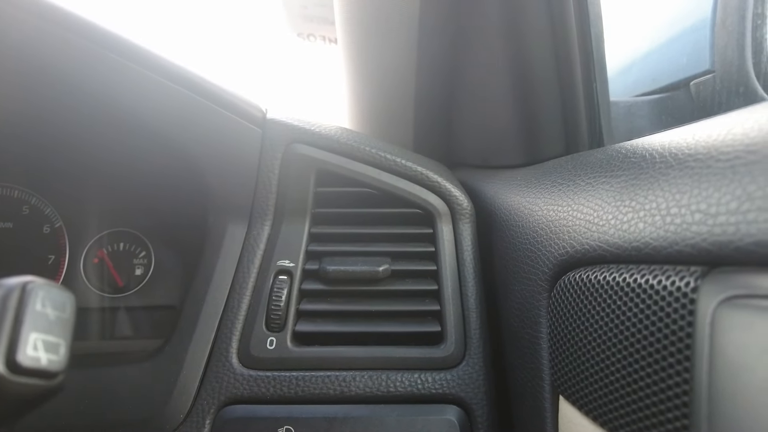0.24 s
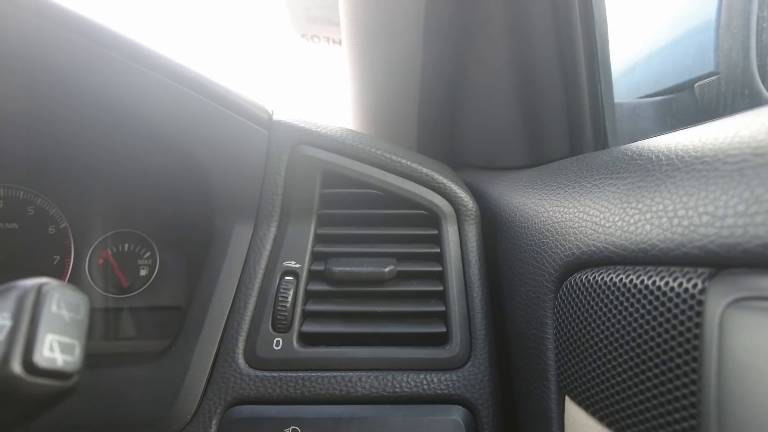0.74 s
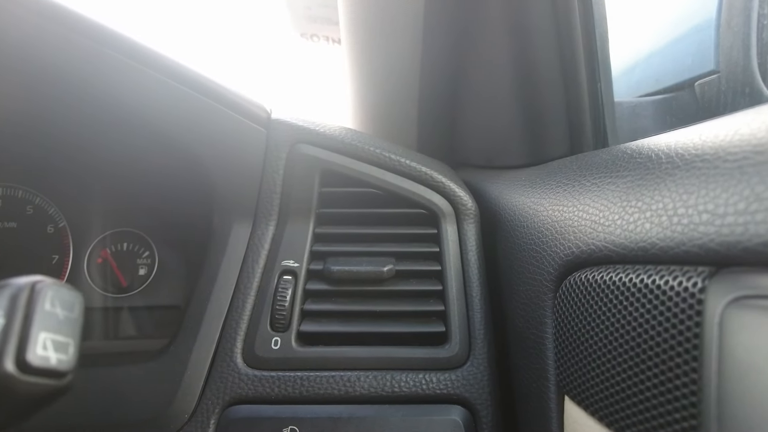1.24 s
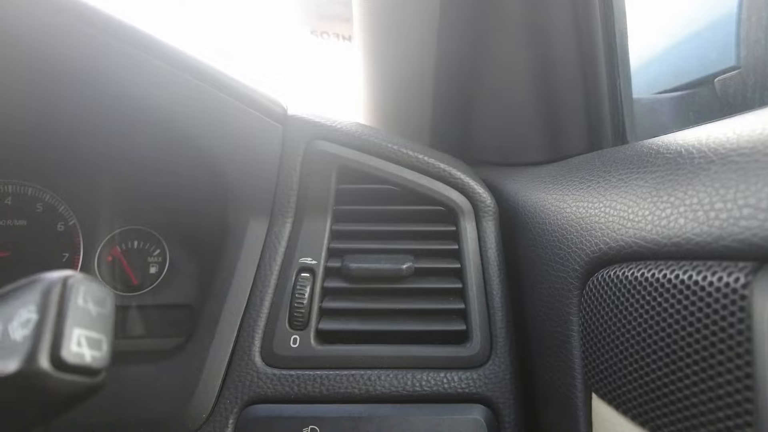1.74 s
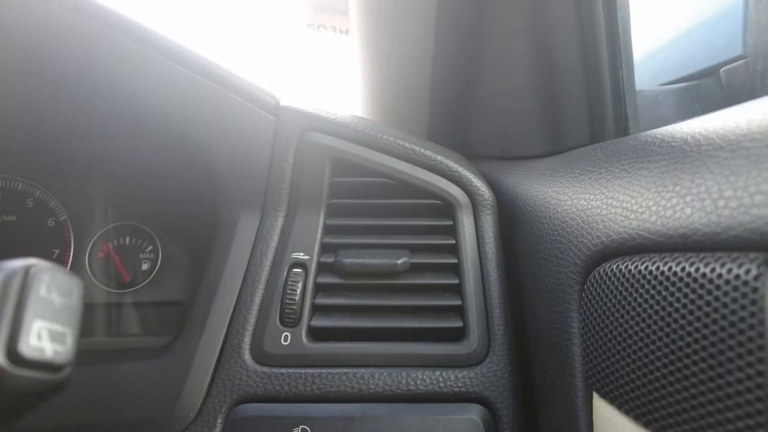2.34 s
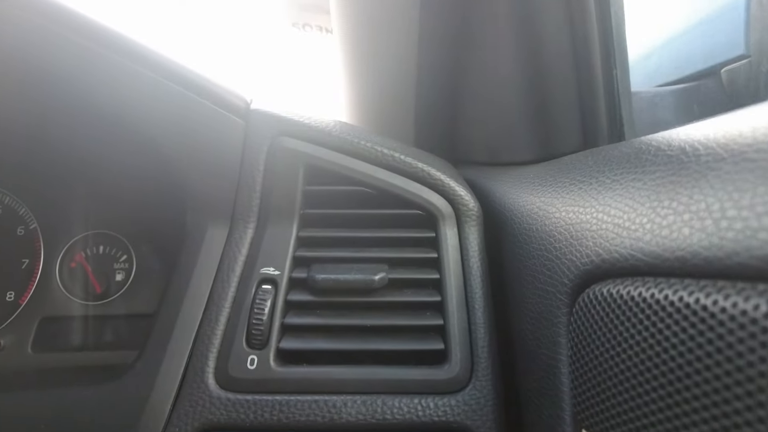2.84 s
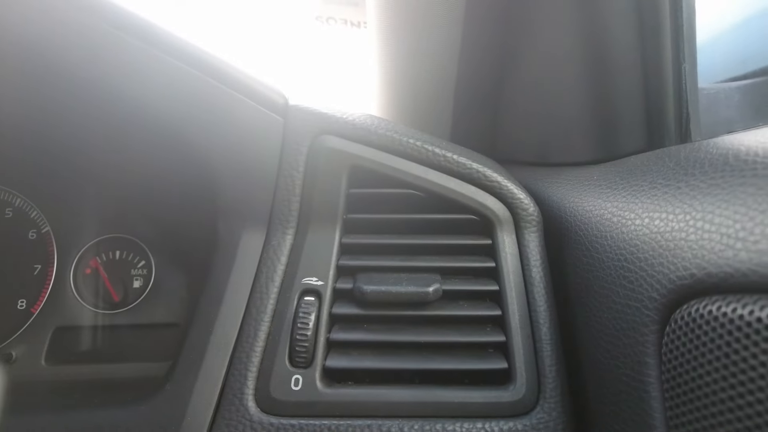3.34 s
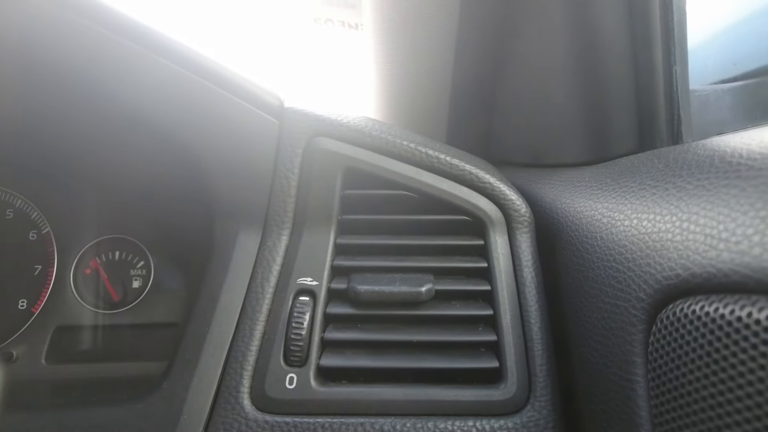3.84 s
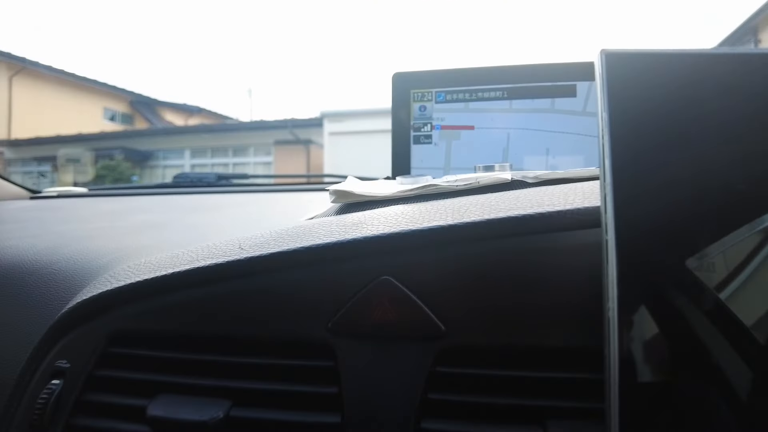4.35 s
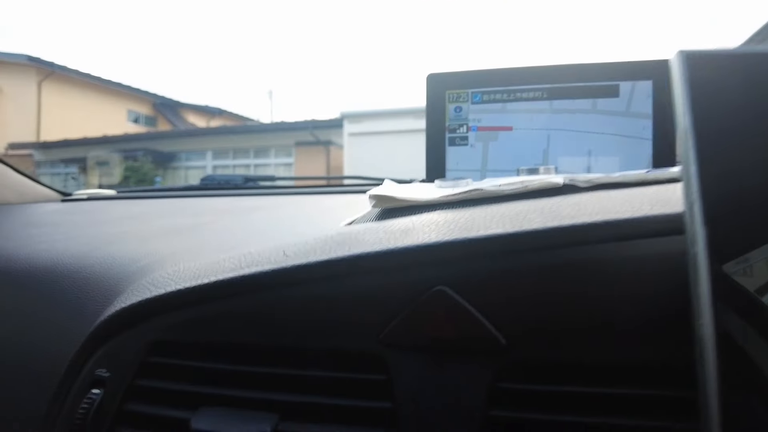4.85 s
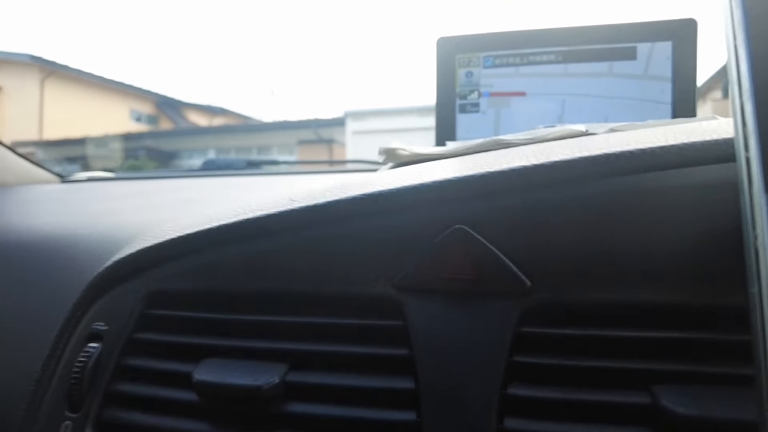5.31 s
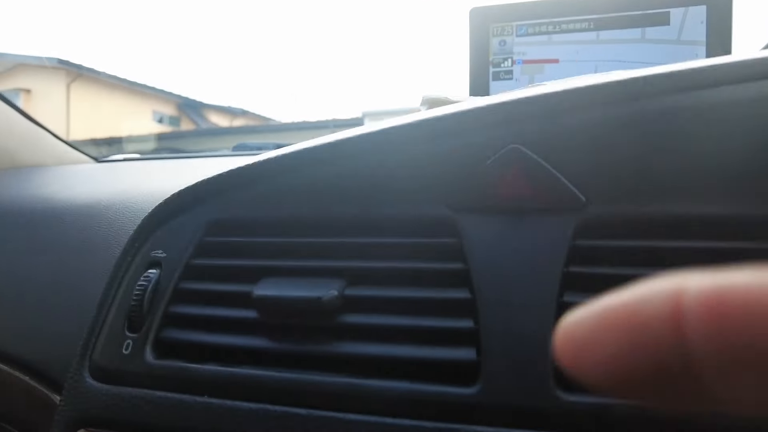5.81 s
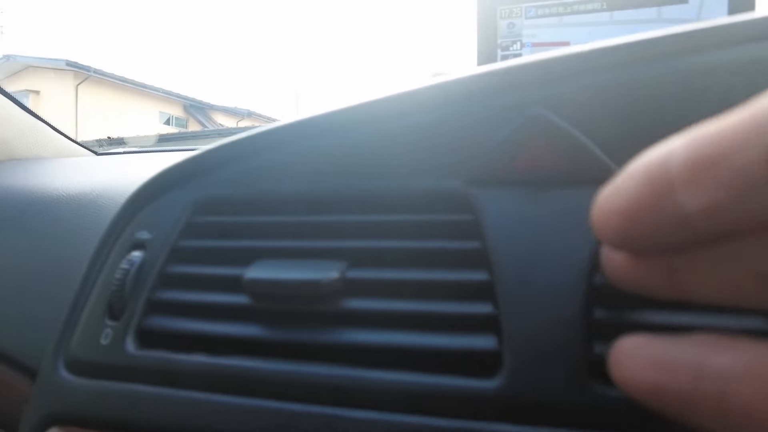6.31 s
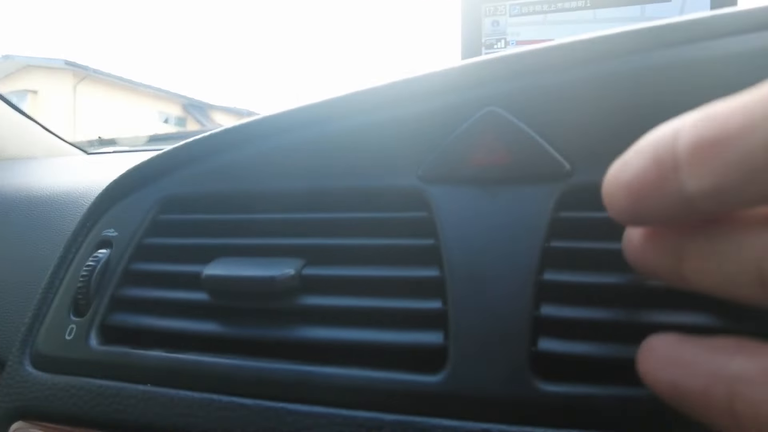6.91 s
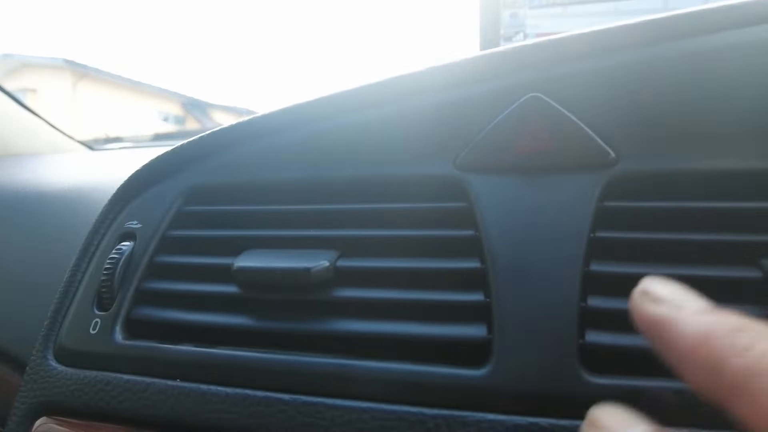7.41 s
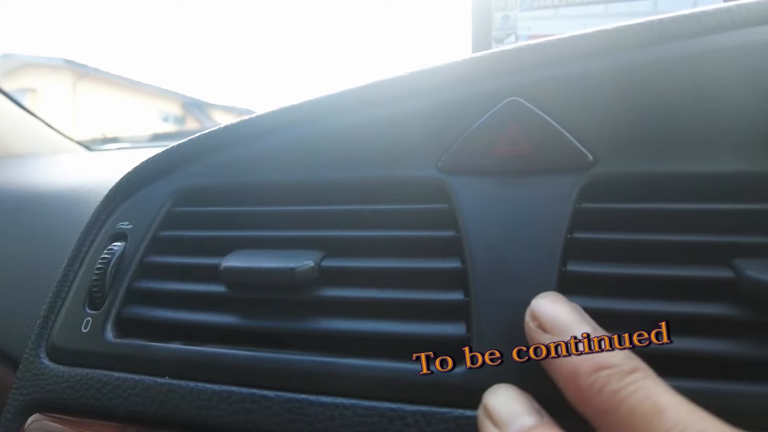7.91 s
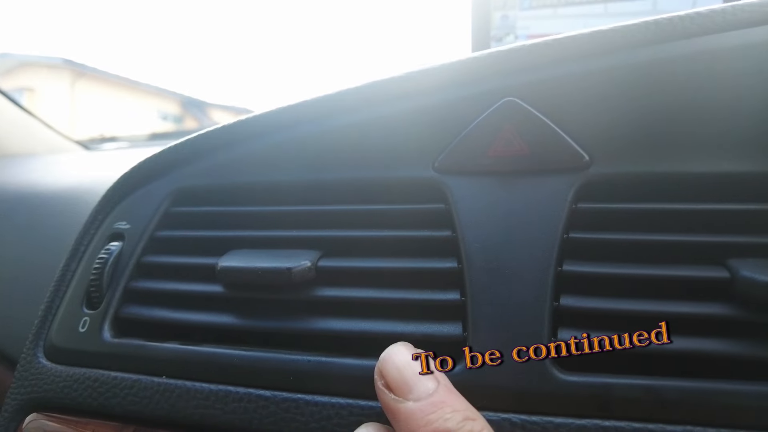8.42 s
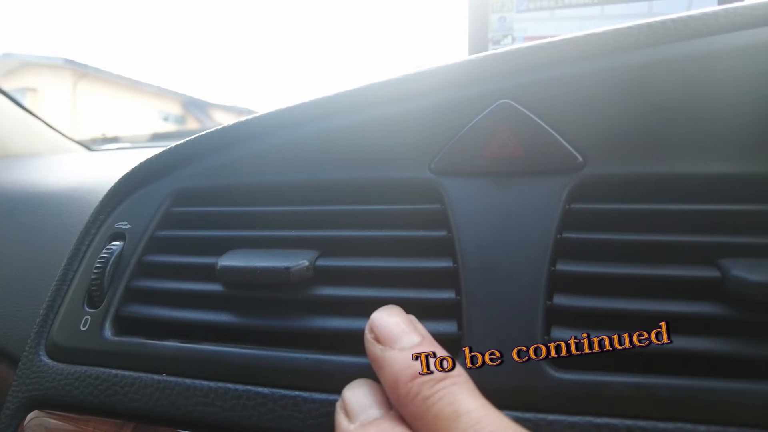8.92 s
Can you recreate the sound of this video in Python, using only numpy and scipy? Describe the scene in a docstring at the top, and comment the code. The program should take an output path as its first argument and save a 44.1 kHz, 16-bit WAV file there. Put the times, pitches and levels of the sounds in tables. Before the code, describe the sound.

Inside a parked car, the engine idles with a deep, even throb while the blower hums and pushes rushing air through the dashboard vents. The microphone is close to a side vent at first. About four seconds in, the sound cuts out for an instant and returns fuller by the centre vents. A few small plastic ticks and very faint cloth rustles occur, and a short puff of air hits the microphone near the end.

```python
"""Inside a parked car, a five-cylinder engine throbs at idle over a low cabin boom, while the blower
motor hums and pushes rushing air through the dashboard vents. The microphone is held first by the side
vent; the sound drops out for an instant and returns, fuller, by the centre vents. One puff of air hits
the microphone, plastic ticks now and then, and rubbing cloth rustles faintly."""
import sys
import numpy as np
from scipy import signal
from scipy.fft import rfft, irfft, next_fast_len
from scipy.io import wavfile

SR = 44100
rng = np.random.default_rng(int(sys.argv[2]) if len(sys.argv) > 2 else 0)


def wav_record(signal):
    """Record a signal, one row per channel, as 16-bit PCM in the file named by sys.argv[1]."""
    frames = np.transpose(np.atleast_2d(signal))
    bounded = np.clip(frames, -1, 1)
    # unit amplitude maps onto the largest positive 16-bit level
    quanta = np.round(bounded * 32767).astype(np.int16)
    wavfile.write(sys.argv[1], SR, quanta)


N = 403956
TIME = np.arange(N) / SR
STOP_S, RESUME_S = 4.07775, 4.11384   # the silent gap between the two places

# How the engine idles. Each row: time in seconds, firings per second, level of the main tone in dB.
IDLE_SIDE_VENT = [(0, 31.9, -23.5), (.55, 31.85, -24.5), (1.0, 32.2, -21), (1.5, 32.4, -21),
                  (2.0, 32.25, -20), (2.5, 32.0, -21.5), (3.0, 32.03, -22.5), (3.4, 32.05, -21.5),
                  (3.85, 32.2, -21.5), (4.0, 32.15, -28), (4.07, 32.1, -23.5)]
IDLE_CENTRE = [(4.12, 32.0, -18), (4.75, 32.15, -16.5), (5.2, 32.05, -17.5), (5.6, 31.72, -20),
               (6.2, 31.78, -19), (6.9, 31.9, -18.5), (7.2, 31.85, -19), (7.9, 31.75, -20.5),
               (8.3, 31.85, -19), (9.16, 31.8, -20)]
# The engine's tones. Each row: multiple of the firing rate, level in dB next to the main tone.
# The multiples that are not whole come from uneven cylinders.
ENGINE_TONES_SIDE_VENT = [(.8, -22), (1, 0), (2, -16), (3, -28), (5, -25), (8, -26)]
ENGINE_TONES_CENTRE = [(.8, -16), (1, 0), (2, -16), (2.8, -26), (5, -31)]

def engine(idle, tones, crest_s):
    """The cylinders fire in quick turn and make a deep throb; all its tones peak together at crest_s."""
    firings_per_s, level_db = in_time(idle)
    firings = np.cumsum(firings_per_s) / SR
    firings -= firings[round(crest_s * SR)]
    throb = sum(from_db(db) * np.cos(2 * np.pi * multiple * firings) for multiple, db in tones)
    return np.sqrt(2) * from_db(level_db) * throb


# The tone of the air that both ears share. Each row: frequency in Hz, relative level in dB.
AIR_SIDE_VENT = [(41, -35), (70, 2), (158, -4), (212, -6), (255, -6.5), (410, -14), (502, -22.5),
                 (1160, -31.5), (1670, -27.5), (5000, -48.5), (10000, -61.5), (15700, -68)]
AIR_CENTRE = [(41, -35), (70, -3.5), (103, -2), (169, -6), (208, -8.5), (260, -7.5), (285, -11.5),
              (312, -18), (562, -19.5), (826, -25), (968, -29), (1750, -29), (15700, -68)]
# The tone of the air's spread between left and right. Each row: frequency in Hz, relative level in dB.
SPREAD_SIDE_VENT = [(15, -12), (40, -3.5), (163, -8), (267, -6), (414, -10), (553, -17), (685, -17.5),
                    (800, -15.5), (1180, -21), (1250, -34), (1520, -27), (2820, -27.5), (3670, -36.5),
                    (4400, -36), (5000, -39), (15700, -61)]
SPREAD_CENTRE = [(41, -19), (70, 0), (105, -6), (168, 2), (198, -6.5), (350, -6), (659, -7.5), (834, -12.5),
                 (1000, -11), (1180, -14), (1250, -20), (1450, -17.5), (3000, -22), (3770, -27.5),
                 (4400, -28.5), (5000, -34), (8000, -38), (13000, -46), (15700, -68)]
# Where the cabin and ducts ring or go dead; by the side vent, the narrow peak near 2856 Hz is a thin whine in
# the air. Each row: frequency in Hz, width in Hz, boost or cut in dB.
CABIN_SIDE_VENT = [(158.2, 25.4, 5), (213, 30.4, -6.5), (265, 49, 3), (470, 82, 3.5), (563, 42, -1.5),
                   (686, 79, 6.5), (832, 33, -8), (876, 93, 3.5), (1124, 58, 3.5), (1164, 61, -6),
                   (1288, 153, 7), (1496, 93, 6.5), (1541, 65, -6), (1720, 120, 2), (1750, 48, -5.5),
                   (2365, 130, -4.5), (2480, 110, 2.5), (2856, 70, 4.5), (3720, 250, -1.5),
                   (4120, 200, 1.5), (4280, 180, 0.5), (7800, 450, 1.5)]
CABIN_CENTRE = [(98, 26, 3), (169, 21, -10.5), (246, 20, -1), (272, 21, -3), (343, 42, 4),
                (563.5, 32, -9.5), (671, 39, 2.5), (829, 49, 5.5), (903, 70, 2), (1075, 71, 5.5),
                (1260, 106, 4), (1715, 40, 1), (1743, 110, 3), (1836, 50, -4), (1995, 68, -2.5),
                (2390, 91, -2), (2460, 79, 3.5), (2904, 110, 4), (3160, 79, 2.5), (3660, 460, -2.5),
                (4150, 180, 1.5), (5800, 1100, 1.6), (7100, 380, -2.5), (7700, 1000, 1.5),
                (11400, 3000, -1.5)]
# How the cabin's ringing pulls the air and the hum to one ear. Each row: frequency in Hz, share in step
# (above 0, the left is louder), share a quarter cycle ahead (above 0, the left comes first).
PULL_SIDE_VENT = [(80, 0, 0), (220, .05, .1), (330, .12, .4), (470, .15, 0), (540, .12, .4), (630, .1, -.6),
                  (780, .27, .42), (1000, .3, 0), (1150, .35, 0), (1320, -.15, .6), (1410, -.35, .15),
                  (1520, .05, .6), (1750, .05, -.1), (1900, .55, 0), (2050, 0, .3), (2300, -.25, -.35),
                  (2500, 0, .4), (2650, -.2, -.5), (3000, -.1, 0), (3500, .1, .1), (6000, .05, 0)]
PULL_CENTRE = [(80, 0, 0), (125, .35, .45), (200, -.1, -.8), (270, .05, .55), (350, .07, .85),
               (410, 0, .65), (490, -.08, -.8), (600, .1, 0), (780, .27, .3), (870, .2, -.45), (940, .2, 0),
               (1030, .27, -.5), (1200, .1, -.2), (1400, -.15, .2), (1550, -.1, -.1), (1750, -.15, .45),
               (1950, -.05, -.1), (2250, -.05, .45), (2370, -.1, 0), (2500, -.1, .45), (2800, -.15, .15),
               (3300, 0, .3), (4000, -.03, 0)]

def vent_air(tone, spread_tone, cabin, pull, shared_db, spread_db, gust_db, flutter_db, eddy_db):
    """Air tumbles through the ducts: its brighter part gusts and flutters, and eddies make it patchy."""
    shared, spread = shaped_noise(tone, spread_tone, cabin, ripple_db=0.8, pull=pull)
    rush = stereo(from_db(shared_db) * shared, from_db(spread_db) * spread)
    for hz in (300, 1200):
        upper = filtered(rush, 2, hz, "high")
        rush += upper * (from_db(gust_db * drift(6) + flutter_db * drift(16)) - 1)
    eddy_edges_hz = np.geomspace(420, 1400, 7)
    for band_hz in zip(eddy_edges_hz, eddy_edges_hz[1:]):
        rush += filtered(rush, 1, band_hz, "band") * (from_db(eddy_db * drift(12)) - 1)
    return rush


# How the air changes as the hand moves the microphone.
# Each row: time in seconds, boost of the hollow band in dB, boost of the upper spread in dB.
HAND_SIDE_VENT = [(0, -.5, -0.5), (2.7, 0.2, 0), (3.2, 0.7, -1.5), (4.07, 1.7, -1.5)]
HAND_CENTRE = [(4.12, -2.7, -2), (5.0, -1.1, -0.34), (6.0, 0.75, 0.29), (7.0, 0.95, 1.2), (7.6, 0.76, 0),
               (9.16, .5, 0)]

def near_grille(rush, hand, hollow_hz):
    """As the microphone shifts by the grille, a hollow band swells and the rush widens or narrows."""
    hollow_db, widen_db = in_time(hand)
    rush = rush + filtered(rush, 1, hollow_hz, "band") * (from_db(hollow_db) - 1)
    upper_spread = filtered(rush[0] - rush[1], 1, 900, "high") / 2
    return rush + stereo(0, upper_spread * (from_db(widen_db) - 1))


# The blower motor's tones. Each entry: level in dB, at 1, 2, 3, .. times the motor's speed.
HUM_SIDE_VENT = [-31, -46, -45, -62, -48, -55, -62.5, -56.5, -59, -60, -75, -62]
HUM_CENTRE = [-33.5, -35, -46, -38.5, -45, -52, -58, -68]

def blower(levels_db, pull, waver_db, rough_db, turns_per_s=50.97):
    """The motor hums; each tone wavers and the fan's load roughens it. Gives shared part and spread."""
    turns = turns_per_s * TIME
    shared = spread = 0
    for multiple, db in enumerate(levels_db, start=1):
        level = from_db(db + waver_db * drift(2.5) + rough_db * drift(14))
        tone = np.sqrt(2) * level * np.exp(2j * np.pi * (multiple * turns + rng.random()))
        shared += tone.real
        spread += (pull_at(pull, multiple * turns_per_s) * tone).real
    return shared, from_db(-14) * spread


def cabin_boom(hz, width_hz, db):
    """The rumbling car body stirs the cabin's lowest note."""
    band_hz = [hz - width_hz / 2, hz + width_hz / 2]
    return from_db(db) * unit_level(filtered(rng.standard_normal(N), 3, band_hz, "band"))


def air_puff(middle_s=8.122, swell_s=.024):
    """A gust hits the microphone and pushes its left and right halves in opposite directions."""
    age = (TIME - middle_s) / swell_s
    lumps = unit_level(filtered(rng.standard_normal(N), 2, 300, "low"))
    swing = np.sin(2 * np.pi * age * 0.32)
    push = from_db(-19) * np.exp(-age ** 2) * (0.15 * lumps - swing)
    return stereo(0.59 * push, push)


# The ticks. Each row: start in seconds, level in dB, seconds for the tail to fade by 60 dB, left minus
# right in dB, treble limit in Hz, note struck hardest in Hz, share of that note that rings on.
TICKS = [(1.0008, -34, .085, -1, 10500, 7600, .1), (4.7597, -35.5, .09, -3.5, 15000, 8900, .04),
         (6.0781, -35.5, .14, -2, 16000, 5400, .02)]
# The notes the plastic rings at. Each row: frequency in Hz, relative level in dB.
PLASTIC_NOTES = [(2900, -3), (3600, -3), (4700, 0), (5400, -4), (6500, -2), (7600, -5), (8900, -7),
                 (10300, -8), (12500, -16), (14500, -13)]

def plastic_ticks(struck_boost_db=4):
    """Plastic cracks briefly, rings with new strengths each time and leaves a dying hiss."""
    out, t = np.zeros((2, N)), np.arange(SR // 5) / SR
    for start_s, db, fade_s, pan_db, top_hz, struck_hz, ring_on in TICKS:
        fade = from_db(-60 * t / fade_s)
        ring = 0
        for hz, note_db in PLASTIC_NOTES:
            struck = hz == struck_hz
            level = from_db(note_db + struck_boost_db * struck + rng.normal(0, 2))
            note = np.sin(2 * np.pi * (hz * t + rng.random()))
            ring += level * note * (fade ** 9 + ring_on * struck * fade)
        noise = filtered(rng.standard_normal((3, len(t))), 2, [3000, 15500], "band")
        crack = from_db(-11) * noise[0] * fade ** 8
        hiss = from_db(-15) * noise[1:] * fade
        onset = 1 - np.exp(-t / .0007)   # the contact takes a moment
        tick = filtered((from_db(-6) * ring + crack + hiss) * onset, 2, top_hz, "low")
        ear_levels = from_db(db + np.array([[pan_db / 2], [-pan_db / 2]]))
        start = round(start_s * SR)
        out[:, start:start + len(t)] += ear_levels * tick
    return out


# Short rubs of cloth and grip. Each row: start in seconds, length in seconds, level in dB.
RUBS = [(.0, 2.1, -79), (.09, .24, -72), (.58, .04, -72), (.9, .04, -69), (1.2, .18, -68), (1.66, .2, -68),
        (1.88, .2, -73), (2.93, .19, -74), (4.22, .45, -71), (4.92, .3, -74), (5.6, .38, -71),
        (6.45, .04, -72), (7.285, .045, -63), (8.0, .35, -75)]
# The bright tone of the rubbing. Each row: frequency in Hz, relative level in dB.
CLOTH_TONE = [(2000, -14), (5000, -5), (8000, 0), (11000, -1), (15000, 0)]

def cloth_rustle(grain_db=2.5, swell_s=.045, fade_s=.035):
    """Rubbing cloth makes a dry, grainy hiss; each rub swells, holds and fades."""
    power = from_db(np.where(TIME < STOP_S, -85, -77)) ** 2   # a trace of rustle between rubs
    for start_s, length_s, db in RUBS:
        before = np.maximum(start_s - TIME, 0) / swell_s
        after = np.maximum(TIME - start_s - length_s, 0) / fade_s
        power += from_db(db) ** 2 * np.exp(-2 * (before + after))
    shared, spread = shaped_noise(CLOTH_TONE, CLOTH_TONE)
    grains = from_db(grain_db * drift(25))
    return np.sqrt(power) * grains * stereo(shared, from_db(-4.5) * spread)


def shaped_noise(tone, spread_tone, bumps=(), ripple_db=0, pull=((1, 0, 0),)):
    """Shared and spread noise, each at level 1, with the bumps and fine ripple of a small space."""
    size = next_fast_len(N)
    hz = np.maximum(np.fft.rfftfreq(size, 1 / SR), 1)
    ripple_hz = np.arange(0, SR / 2, 25)
    ripple = np.interp(hz, ripple_hz, rng.standard_normal(len(ripple_hz)))
    space_db = ripple_db * ripple / (1 + (hz / 2500) ** 2)
    space_db += sum(db * np.exp(-2 * ((hz - centre) / width) ** 2) for centre, width, db in bumps)
    shared, separate = rfft(rng.standard_normal((2, size)))
    share = pull_at(pull, hz)
    spread = share * shared + np.sqrt(np.maximum(1 - abs(share) ** 2, 0)) * separate
    noises = []
    for spectrum, rows in ((shared, tone), (spread, spread_tone)):
        row_hz, row_db = np.transpose(rows)
        tone_db = np.interp(np.log(hz), np.log(row_hz), row_db)
        noises.append(unit_level(irfft(spectrum * from_db(space_db + tone_db), size)[:N]))
    return noises


def pull_at(pull, hz):
    """How much of the shared sound enters the spread; the imaginary part is a quarter cycle ahead."""
    row_hz, in_step, ahead = np.transpose(pull)
    return np.interp(hz, row_hz, in_step) + 1j * np.interp(hz, row_hz, ahead)


def drift(rate_hz):
    """A smooth random wander of about 1 either way; a higher rate wanders faster."""
    step, warm_up = 40, 2000
    hold = np.exp(-2 * np.pi * rate_hz * step / SR)
    noise = rng.standard_normal(N // step + warm_up + 2)
    slow = signal.lfilter([1], [1, -2 * hold, hold * hold], noise)[warm_up:]
    return np.interp(np.arange(N) / step, np.arange(len(slow)), unit_level(slow))


def filtered(sound, order, hz, kind):
    """Keeps the low part, the high part or one band; a higher order cuts more steeply."""
    return signal.sosfilt(signal.butter(order, hz, kind, fs=SR, output="sos"), sound)


def from_db(db):
    """Turns decibels into a number to multiply by."""
    return 10 ** (np.asarray(db) / 20)


def unit_level(sound):
    """Scales a sound to an average (rms) level of 1."""
    return sound / np.sqrt(np.mean(sound ** 2) + 1e-20)


def in_time(rows):
    """Joins timed rows with straight lines, giving each column a value at every sample."""
    seconds, *columns = np.transpose(rows)
    return [np.interp(TIME, seconds, column) for column in columns]


def stereo(shared, spread):
    """Both ears get the shared part; the spread is added on the left and taken away on the right."""
    return np.array([shared + spread, shared - spread])


def scene():
    """The car heard by the side vent, then by the centre vents, with the small noises on top."""
    hum, hum_spread = blower(HUM_SIDE_VENT, PULL_SIDE_VENT, waver_db=1.0, rough_db=1.5)
    bass = engine(IDLE_SIDE_VENT, ENGINE_TONES_SIDE_VENT, crest_s=STOP_S) + hum
    bass += cabin_boom(hz=43, width_hz=46, db=-32.5)
    rush = vent_air(AIR_SIDE_VENT, SPREAD_SIDE_VENT, CABIN_SIDE_VENT, PULL_SIDE_VENT,
                    shared_db=-31, spread_db=-41, gust_db=0.3, flutter_db=0.15, eddy_db=1.3)
    rush = near_grille(rush, HAND_SIDE_VENT, hollow_hz=(1250, 2200))
    by_side_vent = stereo(bass, hum_spread) + rush

    hum, hum_spread = blower(HUM_CENTRE, PULL_CENTRE, waver_db=0.6, rough_db=1.2)
    bass = engine(IDLE_CENTRE, ENGINE_TONES_CENTRE, crest_s=RESUME_S + .002) + hum
    bass += cabin_boom(hz=42, width_hz=52, db=-35)
    rush = vent_air(AIR_CENTRE, SPREAD_CENTRE, CABIN_CENTRE, PULL_CENTRE,
                    shared_db=-29, spread_db=-42.5, gust_db=0.1, flutter_db=0.2, eddy_db=0.8)
    rush = near_grille(rush, HAND_CENTRE, hollow_hz=(550, 1000))
    deep_bass = signal.sosfiltfilt(signal.butter(2, 70, fs=SR, output="sos"), bass)
    lean = np.tanh(-3.5 * np.log(10) / 40)   # the deepest bass is 3.5 dB stronger on the right
    by_centre = stereo(bass, lean * deep_bass + hum_spread) + rush

    car = np.where(TIME < STOP_S, by_side_vent, by_centre)
    return car + cloth_rustle() + plastic_ticks() + air_puff()


def record(dry, microphone_top_hz=15750, cutoff_hz=16560, fade_in_s=.004):
    """The microphone misses the highest treble, and the sound drops out between the two places."""
    heard = signal.sosfilt(signal.ellip(12, .5, 70, microphone_top_hz, fs=SR, output="sos"), dry)
    heard *= (TIME < STOP_S) | (TIME >= RESUME_S)
    heard *= np.minimum(TIME / fade_in_s, 1)
    return signal.sosfilt(signal.ellip(12, .5, 70, cutoff_hz, fs=SR, output="sos"), heard)


dry = scene()
out = record(dry)
wav_record(out)
```